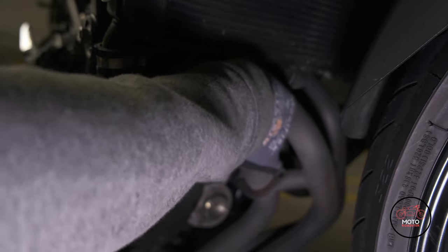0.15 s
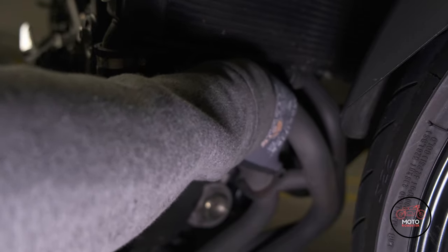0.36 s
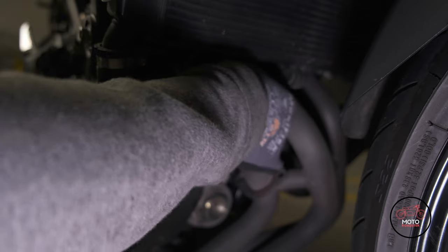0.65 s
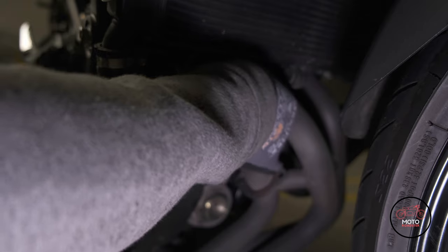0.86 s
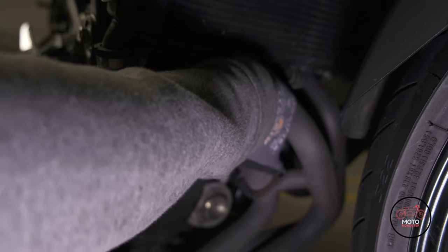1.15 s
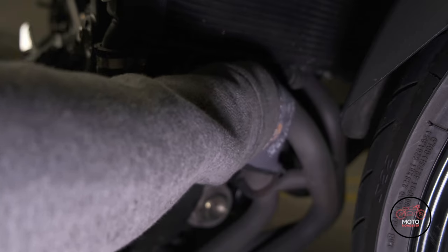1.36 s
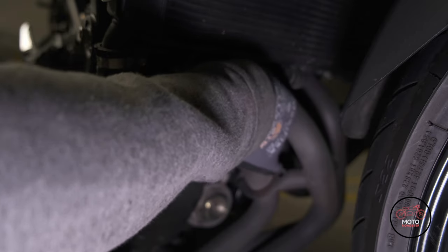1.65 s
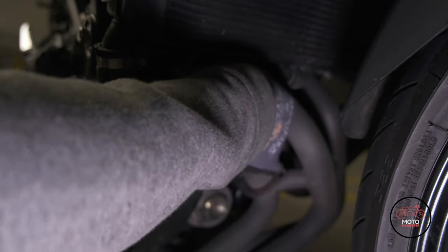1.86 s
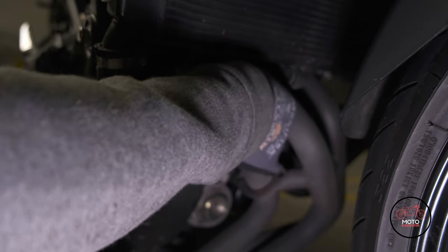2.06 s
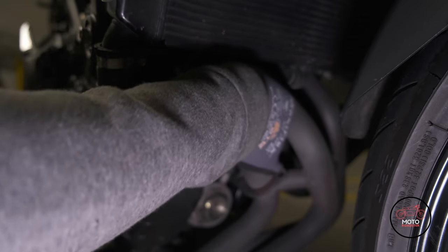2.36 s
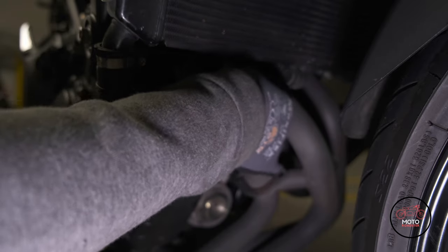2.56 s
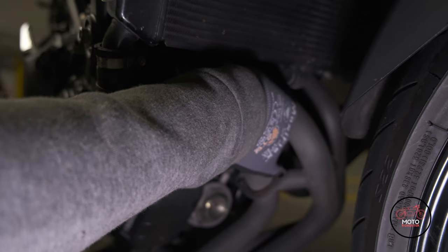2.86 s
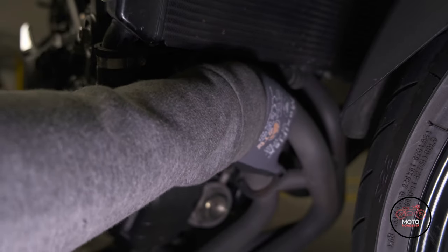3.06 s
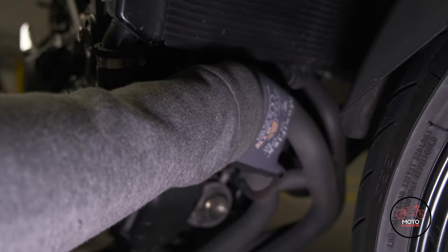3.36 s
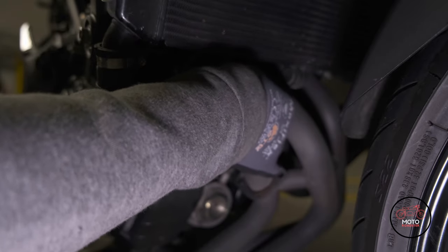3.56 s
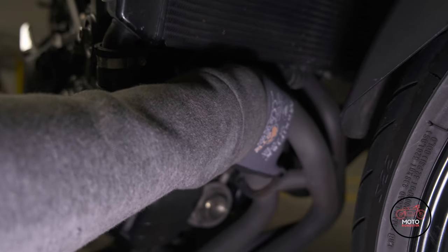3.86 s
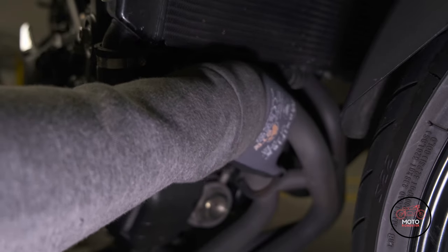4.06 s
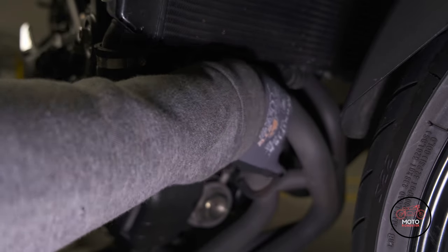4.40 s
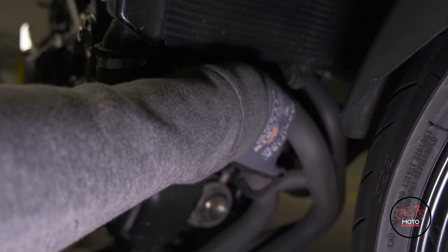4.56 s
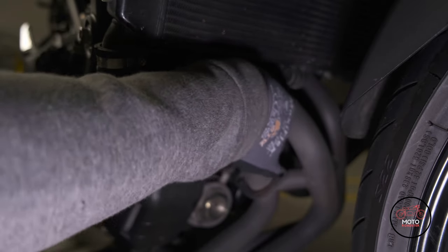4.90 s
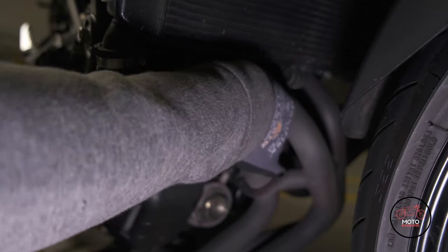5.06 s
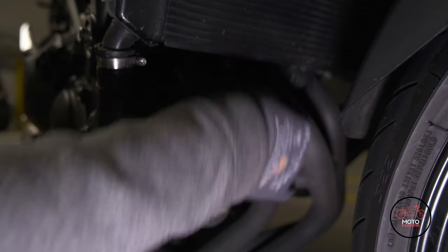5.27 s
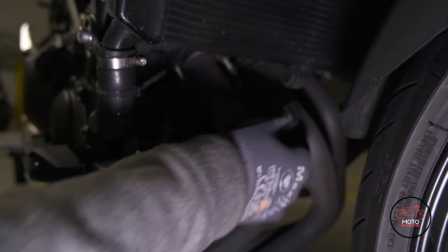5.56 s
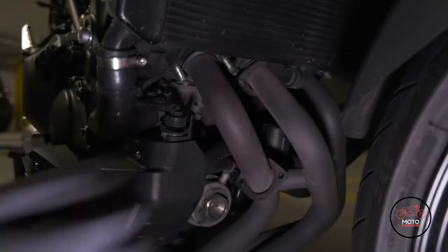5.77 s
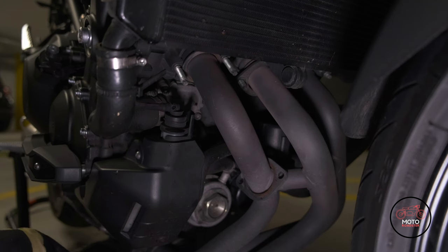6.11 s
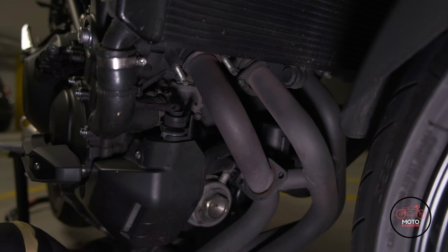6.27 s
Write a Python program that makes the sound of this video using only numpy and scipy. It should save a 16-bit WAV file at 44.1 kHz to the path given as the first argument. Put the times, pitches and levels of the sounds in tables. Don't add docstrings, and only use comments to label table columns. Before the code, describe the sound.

A tight metal bolt squeaks in short, piercing, gliding bursts in a concrete garage, glove ticks between, then a soft pipe knock and sleeve swish over faint hum.

```python
import sys
import numpy as np
from scipy import signal
from scipy.fft import rfft, irfft
from scipy.io import wavfile

SR = 44100
rng = np.random.default_rng(int(sys.argv[2]) if len(sys.argv) > 2 else 0)


def generate_wav(sig):
    pcm = np.round(np.clip(np.atleast_2d(sig).T, -1, 1) * 32767).astype(np.int16)
    wavfile.write(sys.argv[1], SR, pcm)


def ratio(d):
    e = np.asarray(d, float) / 20
    return 10 ** e


N = 284004
LEAD = int(0.1 * SR)

# start t/s, fall t/s, from f/Hz, to f/Hz, level/dB
BREAKS = [
    (0.357, 0.0056, 11200, 9690, -35),
    (0.488, 0.0056, 10100, 9070, -26),
    (1.261, 0.0043, 11810, 8440, -28),
    (1.6706, .0075, 9820, 7096, -19.5),
    (2.040, 0.0081, 8540, 7650, -35.5),
    (2.385, 0.0064, 9450, 7915, -29.5),
    (2.736, 0.0093, 8070, 7000, -40.5),
    (3.181, 0.0054, 12800, 11500, -39),
    (3.420, 0.0068, 6500, 4710, -31.5),
    (4.5275, 0.01, 7700, 6160, -29),
]
# start t/s, length t/s, from f/Hz, to f/Hz, level/dB
SLIDES = [(-.075, 0.035, 8430, 10200, -30.5), (-.04, .031, 11100, 12430, -30),
          (0.362, 0.017, 9700, 10750, -30), (0.379, 0.015, 10840, 11800, -33.5),
          (1.274, .015, 10720, 9760, -30.5), (1.294, 0.0054, 10400, 8750, -28.5),
          (2.046, 0.029, 7770, 11650, -30), (2.076, 0.022, 11420, 10720, -36),
          (2.409, 0.014, 8900, 9350, -29.5), (2.426, 0.028, 9780, 10900, -39),
          (2.746, 0.01005, 6984, 6100, -32.5), (2.769, .014, 5798, 6520, -32),
          (3.438, .014, 5450, 5980, -25.5), (3.453, .023, 6240, 8780, -24)]
# start t/s, length t/s, from f/Hz, level/dB
CATCHES = [(0.406, 0.0046, 11700, -34), (1.264, 0.0071, 9000, -29), (1.678, 0.0031, 7416, -23),
           (1.68, 0.0049, 8100, -22.5), (2.39, 0.0085, 8300, -31), (2.453, 0.0036, 9400, -22),
           (2.46, .003, 9790, -37), (2.785, .004, 6900, -25), (3.185, 0.0036, 11400, -26),
           (3.474, .007, 8300, -26), (3.487, .009, 7800, -20), (3.507, 0.0042, 8900, -18.5),
           (4.556, .005, 6500, -25), (4.575, .005, 8000, -19.5), (4.58, 0.0066, 8600, -29)]
# start t/s, length t/s, f/Hz, level/dB
HOLDS = [
    (0.462, 0.012, 12000, -49),
    (0.493, 0.01, 9360, -33.5),
    (1.3, 0.015, 8900, -29),
    (2.401, .009, 8570, -26.5),
    (2.755, 0.012, 5424, -29.5),
    (2.787, 0.0067, 7540, -27),
    (2.798, 0.0183, 7500, -34),
    (3.427, 0.01, 5457, -29),
    (4.539, 0.0141, 6650, -28),
    (4.5665, .008, 7470, -24.5),
]


def slips():
    creep_s, creep_db, creep_sag = 0.0072, -33, 0.04
    swell_db = 9
    break_bend = 4.5
    slide_fade_db, catch_fade_db = -0.5, 3
    catch_hz_per_s = 190000
    rows = []
    for s, fall, from_hz, to_hz, db in BREAKS:
        faint_db = db + creep_db
        rows.append((s - creep_s, creep_s, from_hz * (1 - creep_sag), from_hz, faint_db - swell_db, faint_db, 1))
        rows.append((s, fall, from_hz, to_hz, db - swell_db, db, break_bend))
    for s, length, from_hz, to_hz, db in SLIDES:
        rows.append((s, length, from_hz, to_hz, db, db - slide_fade_db, 1))
    for s, length, hz, db in CATCHES:
        rows.append((s, length, hz, hz + catch_hz_per_s * length, db, db - catch_fade_db, 1))
    for s, length, hz, db in HOLDS:
        rows.append((s, length, hz, hz, db, db, 1))
    return sorted(rows)


def bolt():
    size = N + LEAD
    pitch, grip = np.zeros(size), np.zeros(size)
    for s, length, from_hz, to_hz, from_db, to_db, bend in slips():
        a = round(s * SR) + LEAD
        left = np.linspace(1, 0, round(length * SR)) ** bend
        b = a + len(left)
        grip[a:], pitch[a:] = 0, to_hz
        pitch[a:b] = to_hz + (from_hz - to_hz) * left
        grip[a:b] = ratio(to_db + (from_db - to_db) * left)
    pitch = smooth(pitch, 1500) * (1 + 0.0096 * drift(242, size))
    overtone = ratio(-5 - 4 * (np.maximum(pitch, 4e3) - 5e3) / 1e3)
    phase = 2 * np.pi * np.cumsum(pitch) / SR
    second = np.sin(2 * phase) * (2 * pitch < 0.45 * SR)
    third = np.sin(3 * phase) * (3 * pitch < 0.45 * SR)
    tone = np.sin(phase) + overtone * ratio(3.8 * drift(760, size)) * (second + 0.41 * third)
    high = signal.butter(2, 1200, "high", fs=SR, output="sos")
    grit = 0.021 * signal.sosfilt(high, rng.standard_normal(size))
    unsteady = ratio(3.3 * drift(245, size))
    return np.sqrt(2) * smooth(grip, 550) * unsteady * (tone + grit)


# delay t/s, level/dB
ENGINE_ECHOES = [(.0011, -15.5), (.0026, -7), (.0047, -24), (.0083, -12.5), (.0131, -16.5)]
PIPE_HZ = [5448, 5577, 5690, 6390, 6708, 7176, 7340, 7537, 7919, 8247, 8436, 8630, 9146, 9282, 9582]
# level/dB, time to fall 60 dB t/s
PIPES = [(-23, 0.72), (-33, 0.37), (-26, 0.68), (-10, 0.9), (-6, 0.72), (-2, 0.33), (-7.5, 0.73),
         (-12, 0.81), (-22, 0.9), (3.5, 0.81), (-23, .5), (-1, 0.34), (-9, 0.25), (-3, 0.44), (-18, 0.2)]


def near_metal(x):
    out = x.copy()
    for k, (lag_s, echo_db) in enumerate(ENGINE_ECHOES):
        lag = round(lag_s * SR)
        out[lag:] += (-1) ** k * ratio(echo_db) * x[:-lag]
    out *= ratio(-0.5)
    for hz, (mode_db, t60) in zip(PIPE_HZ, PIPES):
        out += ratio(mode_db - 62) * ring(x, hz, t60)
    return out


KNOCKED_HZ = [490, 540, 624, 711, 737, 760, 790, 1028, 1093, 1126, 1260, 1348, 1461, 1617, 1776, 1891, 1945,
              2277, 2485, 2541, 2700, 3050, 4200]
# level/dB, time to fall 60 dB t/s
KNOCKED = [(-16.5, 0.97), (-9, 0.34), (2, 0.04), (-16.5, 0.44), (-0.5, 0.13), (-19.5, 1.75), (-18, 0.37),
           (-9, 0.15), (-23, 0.4), (-7.5, 0.1), (-25, 0.098), (-5.5, 0.15), (-9.5, 0.048), (-6, 0.057),
           (-10, 0.043), (-12.5, 0.057), (-30, 0.41), (-18.5, 0.057), (-9, 0.043), (-14, 0.11), (-20, 0.04),
           (-16, 0.02), (-16, 0.031)]


def knock():
    knock_s, knock_db = 5.2005, -23
    blow = np.zeros(N)
    for lag_s, contact_db in [(0, -32), (0.0022, 0.5), (0.0048, -6)]:
        blow[round((knock_s + lag_s) * SR)] = ratio(knock_db + contact_db)
    push = smooth(blow, 5900)
    rings = [ratio(mode_db) * ring(push, hz, t60) for hz, (mode_db, t60) in zip(KNOCKED_HZ, KNOCKED)]
    apart = np.diff(np.log(KNOCKED_HZ), prepend=0) > 0.075
    return np.cumprod(np.where(apart, -1, 1)) @ np.array(rings)


# t/s, peak level/dB, centre f/Hz, width/octaves
TICKS = [(0.6077, -47, 3850, 1.7), (0.7032, -49.5, 3170, 1.8), (0.9375, -38, 3920, 1.3),
         (1.1056, -35.5, 3660, 2.6), (1.326, -58.5, 5070, 1.85), (2.607, -48, 4150, 1.9),
         (3.0584, -41.5, 4240, 1.86), (3.2919, -47.5, 3530, 1.7), (3.706, -41.5, 5340, 1.8),
         (3.896, -49, 5350, 1.45), (4.567, -30.5, 5600, 2.4), (4.652, -36, 4500, 2), (5.9877, -57, 4140, 2),
         (5.999, -38.5, 4850, 2.5), (6.2542, -55, 4970, 1.6)]


def ticks():
    t60_s, rise_s = 0.027, 0.00097
    out, t = np.zeros(N), np.arange(4000) / SR
    bursts = rng.standard_normal((len(TICKS), len(t)))
    for (s, peak_db, hz, octaves), burst in zip(TICKS, bursts):
        shape = ratio(peak_db - 6.5 - 60 * t / t60_s) * (1 - np.exp(-t / rise_s))
        noise = band_noise(burst, hz, octaves) + 0.66 * band_noise(burst, hz, 0.29)
        out[round(s * SR):][:len(t)] += noise * shape
    return out


# start t/s, length t/s, level/dB, centre f/Hz, width/octaves
SCUFFS = [(0.262, 0.021, -54, 5400, 1.6), (0.92, 0.017, -64, 4950, 0.98), (1.557, 0.018, -52.5, 3800, 0.87),
          (1.757, 0.023, -56, 3980, 2.7), (2.324, 0.038, -53.5, 4200, 1.4),
          (4.349, 0.028, -60.5, 3970, 2.2), (4.464, 0.031, -54.5, 4450, 1.4),
          (4.937, 0.05, -54.5, 5280, 1.5), (5.121, 0.17, -54, 5240, 1.03), (1.95, 0.85, -69.5, 896, 1.75),
          (3.002, 0.6, -71.5, 897, 1.64), (4.55, 0.12, -67.5, 1380, 0.79),
          (5.196, 0.024, -43.5, 2600, 1.45)]


def scuffs():
    out = np.zeros(N)
    grain = ratio(1.8 * drift(460)) * rng.standard_normal(N)
    for s, length, level_db, hz, octaves in SCUFFS:
        a, count = round(s * SR), round(length * SR)
        swell = np.hanning(count) ** 0.45
        out[a:a + count] += ratio(level_db) * swell * band_noise(grain[a:a + count], hz, octaves)
    return out


# f/Hz, level/dB per Hz
CLOTH = [(240, -20.5), (400, 0), (758, 0.5), (999, -5), (1920, -9.5), (2830, -12.5), (8000, -22.5),
         (10400, -54.5), (17600, -120)]
# f/Hz, level/dB per Hz
SWISH = [(1760, -42), (3000, -5), (4350, 6.5), (8470, -1.5), (12700, -0.5), (15500, -13)]


def sleeve():
    rub = stroke(5.85, 6.0, -50.5, 28, 20.4)
    drag = stroke(5.8, 6.0, -64.5, 75, 58)
    flick = stroke(6.002, 6.23, -56.5, 900, 69)
    grain = ratio(0.5 * drift(17.3) + 1.0 * drift(300))
    return grain * (rub * coloured_noise(CLOTH) + (drag + flick) * coloured_noise(SWISH))


def stroke(full_s, until_s, level_db, swell_db, fade_db):
    t = np.arange(N) / SR
    early, late = np.maximum(full_s - t, 0), np.maximum(t - until_s, 0)
    arm_moves_s = 5.3
    return (t > arm_moves_s) * ratio(level_db - swell_db * early - fade_db * late)


# f/Hz, time to fall 60 dB t/s
GARAGE_T60 = [(300, 0.88), (1000, 1.37), (4000, 0.88), (6500, 0.86), (9000, 0.62), (12000, 0.33),
              (15000, 0.53)]
# f/Hz, level/dB
GARAGE_DB = [(300, 2), (1000, -6.5), (4000, -6), (6500, -15.5), (9000, -12), (12000, -12.5), (15000, -16)]


def garage(x):
    t, tail = np.arange(int(1.6 * SR)) / SR, 0
    white = rng.standard_normal((2, len(t)))
    edges = 150 * 2.0 ** np.arange(0, 7.1, 0.5)
    for k, (low, high) in enumerate(zip(edges, edges[1:])):
        band_filter = signal.butter(2, [low, high], "band", fs=SR, output="sos")
        band = signal.sosfilt(band_filter, white[k % 2])
        centre = np.sqrt(low * high)
        t60 = at_hz(GARAGE_T60, centre)
        height = ratio(at_hz(GARAGE_DB, centre)) / np.sqrt(t60 * SR / np.log(1e6))
        tail = tail + band * height * ratio(-60 * t / t60)
    build_up = 1 - np.exp(-t / 0.0023)
    return signal.fftconvolve(x, tail * build_up)[:len(x)]


# start t/s, length t/s, f/Hz, level/dB
CHIRPS = [
    (0.066, 0.0069, 3400, -64),
    (1.562, 0.027, 3270, -63),
    (1.85, 0.022, 3530, -67),
    (1.983, 0.026, 3280, -64.5),
    (4.853, 0.037, 3950, -61),
    (5.004, 0.04, 3950, -60),
]


def chirps():
    out = np.zeros(N)
    for s, length, hz, level_db in CHIRPS:
        samples = 1.4 * length * SR
        u = np.arange(round(samples)) / samples
        swell = np.sin(np.pi * u ** 0.75) ** 1.3
        pitch = hz * (1 + 0.016 * (swell - 0.6) + 0.006 * drift(150, len(u)))
        phase = 2 * np.pi * np.cumsum(pitch) / SR
        out[round((s - 0.005) * SR):][:len(u)] += ratio(level_db + 4) * swell * np.sin(phase)
    return out


# f/Hz, level/dB per Hz
BACKGROUND = [(13, -56.5), (22, -28), (53, -11), (109, -8), (156, -18.5), (205, 0), (249, 0), (432, -19.5),
              (618, -19), (988, -25.5), (1100, -25), (2200, -32), (6440, -31.5), (14700, -37.5),
              (16000, -30.5)]
# f/Hz, width f/Hz, level/dB
DRONE = [(120, 9.8, -60), (172, 16, -63.5), (195.4, 19, -66.5), (239.6, 16.2, -50.5), (292.8, 9.9, -60),
         (334.1, 7.6, -62.5)]


def background():
    out = ratio(-46.5 - 5.5) * coloured_noise(BACKGROUND)
    for hz, width_hz, level_db in DRONE:
        t60 = np.log(1000) / np.pi / width_hz
        hum = ring(rng.standard_normal(N + SR), hz, t60)[SR:]
        out += ratio(level_db) * rms_one(hum)
    return out


def rms_one(x):
    return x / np.sqrt(np.mean(x ** 2) + 1e-20)


def at_hz(points, hz):
    table_hz, values = np.array(points).T
    return np.interp(np.log(hz), np.log(table_hz), values)


def smooth(x, hz):
    r = np.exp(-2 * np.pi * hz / SR)
    return signal.lfilter([(1 - r) ** 2], [1, -2 * r, r * r], x)


def drift(hz, size=N):
    return rms_one(smooth(rng.standard_normal(size + SR), hz)[SR:])


def ring(force, hz, t60):
    r, w = ratio(-60 / (t60 * SR)), 2 * np.pi * hz / SR
    return signal.lfilter([0, np.sin(w)], [1, -2 * r * np.cos(w), r * r], force + 1e-18)


def coloured_noise(spectrum):
    hz = np.maximum(np.arange(N // 2 + 1) * SR / N, 1)
    return rms_one(irfft(rfft(rng.standard_normal(N)) * ratio(at_hz(spectrum, hz)), N))


def band_noise(white, hz, octaves):
    spread = 2 ** (octaves / 2)
    band = signal.butter(2, [hz / spread, hz * spread], "band", fs=SR, output="sos")
    return rms_one(signal.sosfilt(band, white))


def scene():
    hiss_top = signal.ellip(12, 0.5, 45, 15780, fs=SR, output="sos")
    quiet = signal.sosfilt(hiss_top, sleeve() + background())
    close = near_metal(bolt())
    far = chirps()
    close[LEAD:] += ticks() + scuffs() + knock() + 0.5 * far
    in_room = (close + garage(close))[LEAD:]
    return (in_room + quiet + 0.5 * far)[None]


def band_limit(x):
    return signal.sosfilt(signal.butter(12, 16650, fs=SR, output="sos"), x)


def record(dry):
    bass_cut = signal.butter(2, 70, "high", fs=SR, output="sos")
    top_cut = signal.cheby2(12, 60, 16600, fs=SR, output="sos")
    mix = signal.sosfilt(top_cut, signal.sosfilt(bass_cut, dry))
    return band_limit(mix)


dry = scene()
out = record(dry)
generate_wav(out)
```